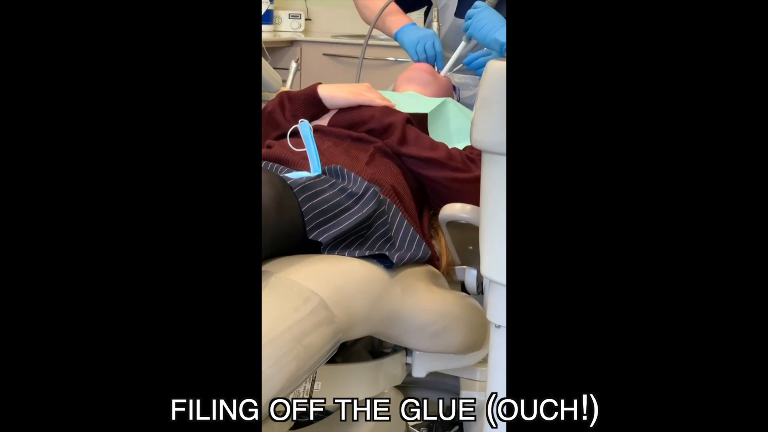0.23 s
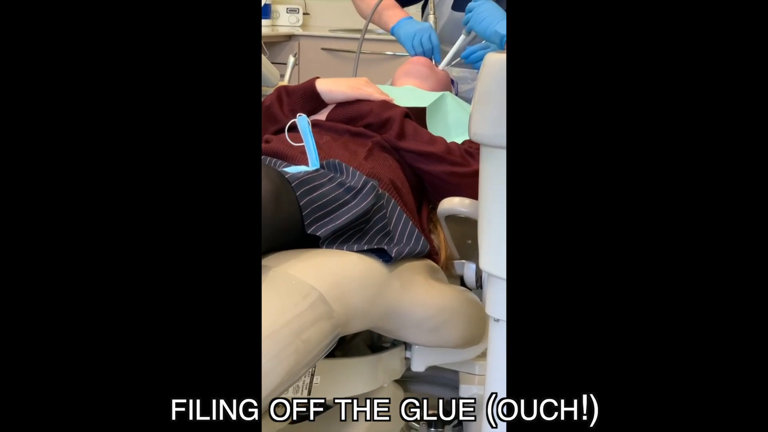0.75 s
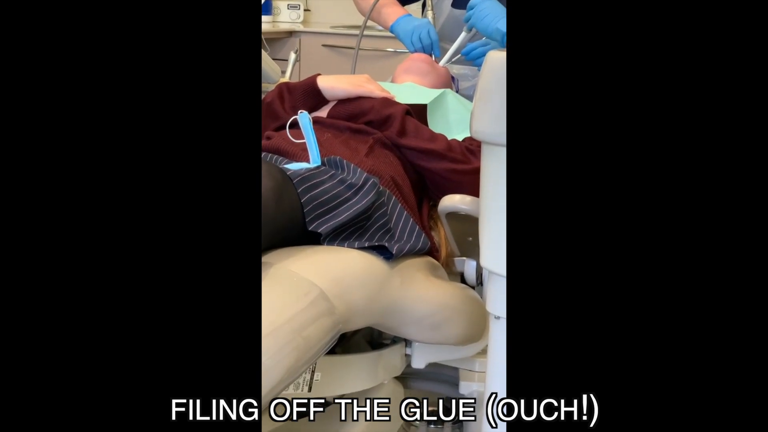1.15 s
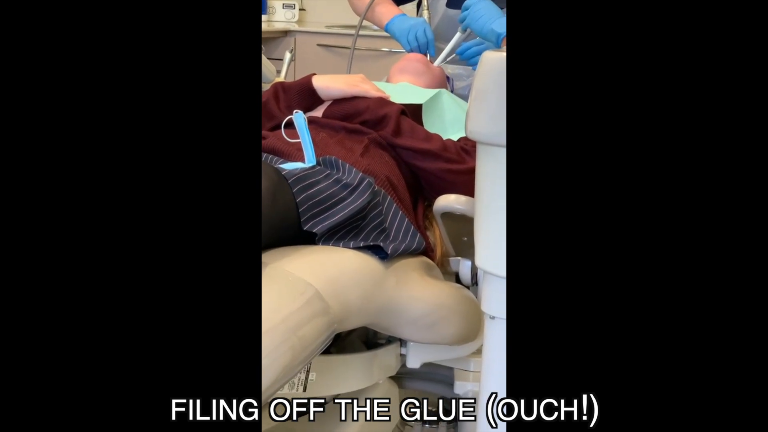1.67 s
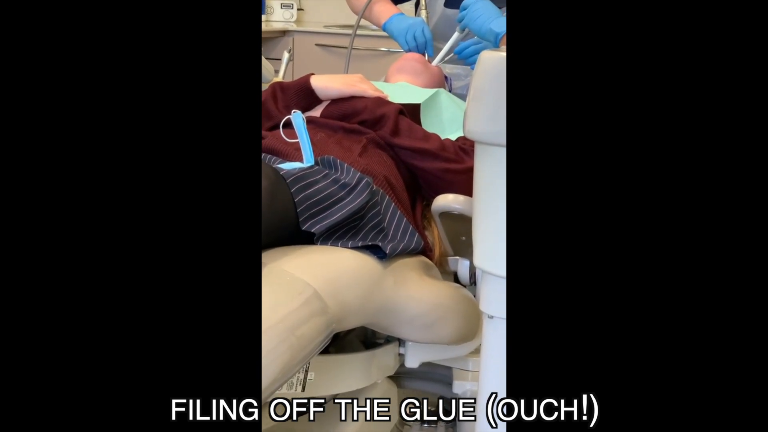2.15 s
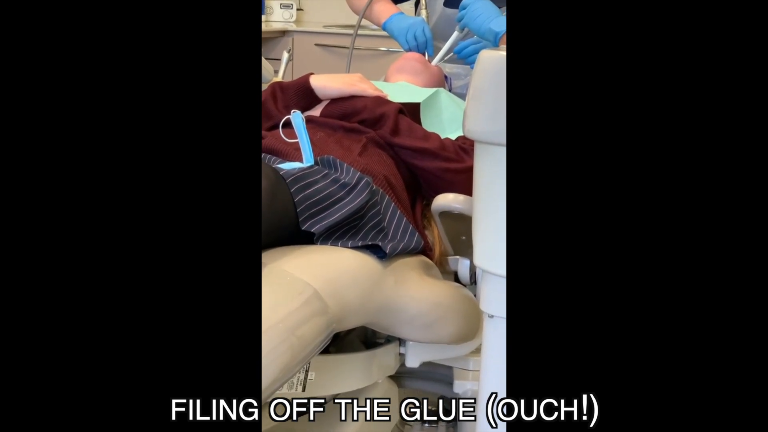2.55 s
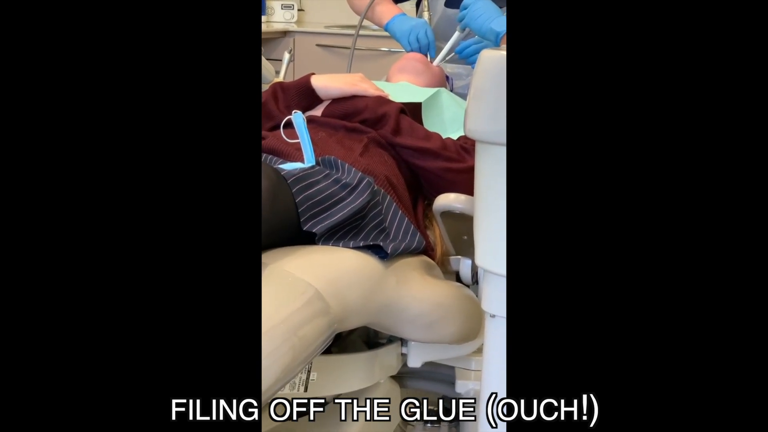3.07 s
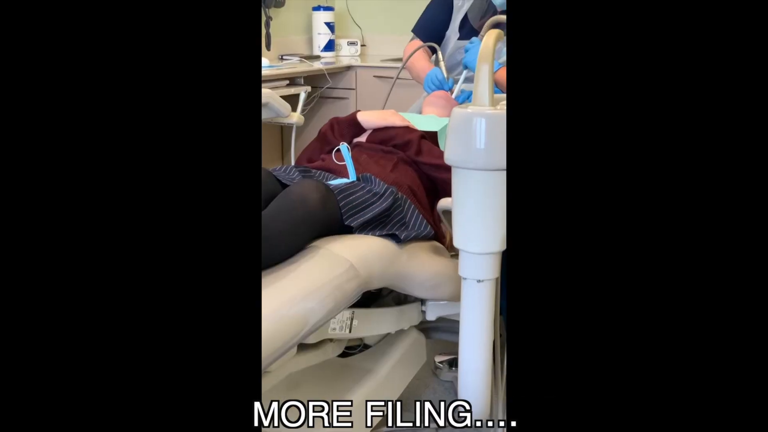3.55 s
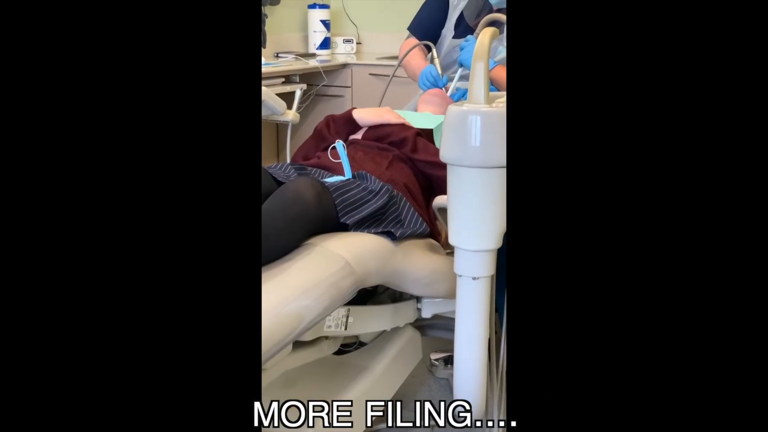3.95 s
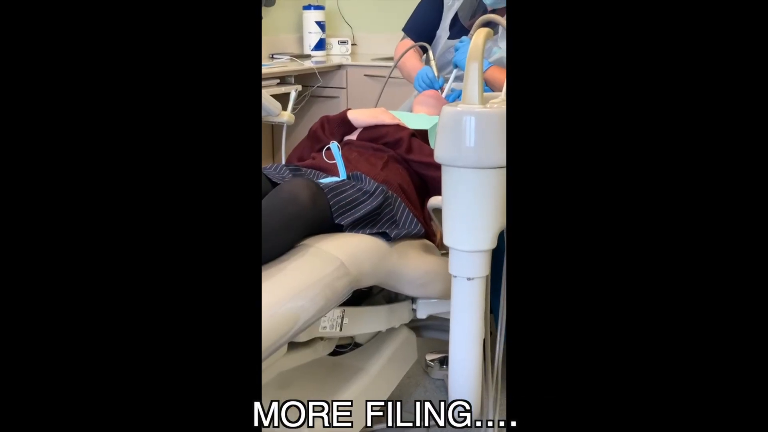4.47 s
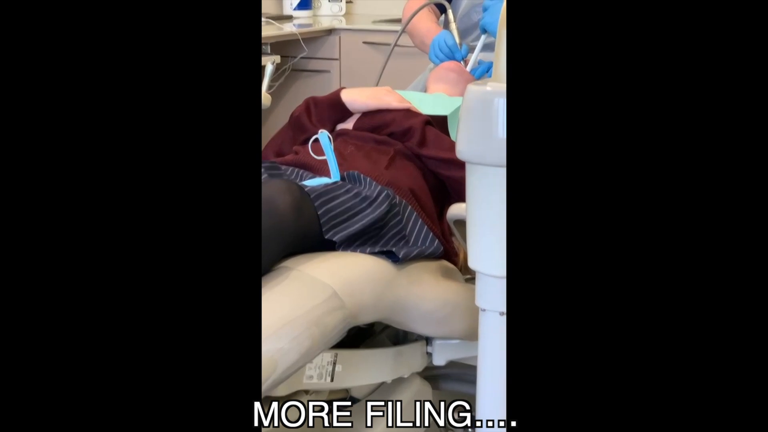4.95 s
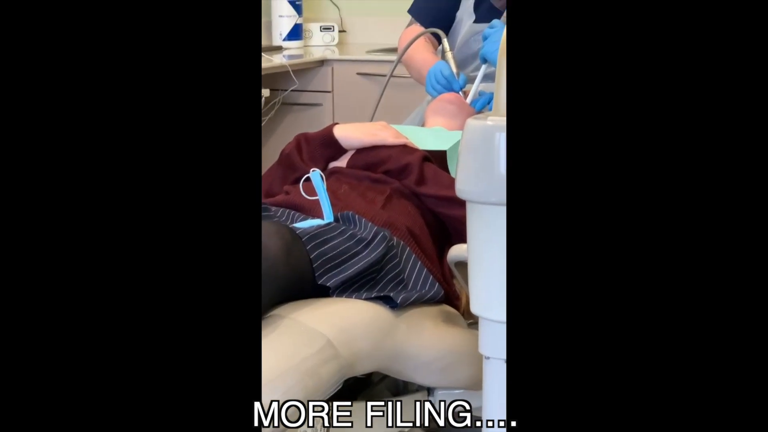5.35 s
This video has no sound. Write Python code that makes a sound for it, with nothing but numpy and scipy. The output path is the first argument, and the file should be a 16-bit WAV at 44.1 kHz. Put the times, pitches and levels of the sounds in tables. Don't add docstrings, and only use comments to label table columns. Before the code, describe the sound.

Constant airy spray and hollow suction noise in a clinic, with faint instrument taps, throbbing pump and a growing bass drone.

```python
import sys
import numpy as np
from scipy import signal
from scipy.fft import rfft, irfft, next_fast_len
from scipy.io import wavfile
from scipy.ndimage import uniform_filter1d, map_coordinates

SR = 44100
rng = np.random.default_rng(int(sys.argv[2]) if len(sys.argv) > 2 else 0)


def store_pcm(level_fs):
    pcm = np.round(np.clip(level_fs, -1, 1) * 32767).astype(np.int16)
    wavfile.write(sys.argv[1], SR, np.atleast_2d(pcm).T)


def to_linear_factor(level_db):
    exponent = np.asarray(level_db, float) / 20
    return 10 ** exponent


N = 247611
CUT_S = 3.228


def at_hz(points, hz, column=1):
    points = np.array(points)
    return np.interp(np.log(hz), np.log(points[:, 0]), points[:, column])


def by_shot(first, second):
    return np.where(np.arange(N) < CUT_S * SR, first, second)


def drift(rate):
    pole = np.exp(-80 * np.pi * rate / SR)
    noise = rng.standard_normal(N // 40 + 2002)
    slow = signal.lfilter([1], [1, -2 * pole, pole * pole], noise)[2000:]
    return np.interp(np.arange(N) / 40, np.arange(len(slow)), slow / slow.std())


def port_noise(spectrum, resonances, ports, lo_hz, hi_hz):
    size = next_fast_len(N)
    hz = np.maximum(np.fft.rfftfreq(size, 1 / SR), 1)
    power = to_linear_factor(at_hz(spectrum, hz)) ** 2 * (hz > spectrum[0][0]) * (hz < spectrum[-1][0])
    peaks = sum((to_linear_factor(db) ** 2 - 1) / (1 + (2 * (hz - f) / width) ** 2) for f, width, db in resonances)
    shape = np.sqrt(power * np.maximum(1 + peaks, 0))

    ridges = rng.standard_normal(SR // 90)
    ridge_db = 1.9 * np.interp(hz / 45, np.arange(len(ridges)), ridges)
    shape = shape * to_linear_factor(ridge_db * (hz > 2300))

    alike = np.clip(at_hz(ports, hz), 0, 1)
    turn = np.exp(.5j * at_hz(ports, hz, column=2))
    tilt = to_linear_factor(at_hz(ports, hz, column=3) / 2)
    shared, apart = rfft(rng.standard_normal((2, size)))
    shared = np.sqrt(1 + alike) * shared
    apart = np.sqrt(1 - alike) * apart
    left = (shared + apart) * turn * tilt
    right = (shared - apart) / turn / tilt
    pair = shape * np.array([left, right])
    band = (hz > lo_hz) & (hz < hi_hz)
    mid_rms = np.sqrt(2 * np.sum(np.abs(pair.mean(axis=0)[band]) ** 2)) / size
    return irfft(pair, size)[:, :N] / mid_rms


# frequency in Hz, density in dB per Hz.
VENT_COLOUR = [(25, -19), (43, 2), (75, -8), (95, -7), (165, -2), (290, 0.5), (360, -1), (480, -3.5),
               (560, -13.5), (1000, -12.5), (1400, -24)]
# frequency in Hz, width in Hz, height in dB.
ROOM_MODES = [(75.3, 13, 13.5), (145.3, 10, 9.5), (251.6, 2.7, 5), (293, 13, 6.5), (338, 16, 6)]
# frequency in Hz, likeness from 0 to 1, lead of the left in radians, left over right in dB.
AIR_PORTS = [
    [(60, 1, 0, 0), (190, .96, -.2, -1.3), (340, .91, -.35, -2), (620, .66, -.7, -3), (1100, .42, .3, -2),
     (1900, .3, .8, -1.5), (2500, .6, 3, -1), (3250, .74, 3.1, 0), (3900, .4, 1.2, 0), (4500, .62, 3, 0)],
    [(60, 1, 0, 0), (190, .96, -.2, -1.3), (340, .91, -.35, -2), (620, .66, -.6, -3), (1100, .42, .3, -2),
     (1900, .3, .8, -1.5), (2700, .76, 3.1, -1), (3200, .72, 3, 0), (3900, .5, 2.6, 0), (4500, .62, 3, 0)],
]


def ventilation():
    level_db = by_shot(-47.5, -46.5) + .5 * drift(1.3)
    return to_linear_factor(level_db) * port_noise(VENT_COLOUR, ROOM_MODES, AIR_PORTS[0], 86, 970)


# frequency in Hz, level in dB rms.
MAINS_LINES = [
    [(100, -52.5), (200, -58)],
    [(100.2, -41), (200.4, -66)],
]


def mains():
    t = np.arange(N) / SR
    shots = [sum(np.sqrt(2) * to_linear_factor(db) * np.sin(2 * np.pi * hz * t) for hz, db in lines)
             for lines in MAINS_LINES]
    return by_shot(*shots) * to_linear_factor(1.2 * drift(4.9))


# pitch in Hz, level in dB, throbs a second,
# throb depth from 0 to 1, top of one throb in seconds.
PUMP = [
    (48.15, -44.5, 2.9, .6, 1.78),
    (48.15, -41, 5.0, .55, 3.52),
]


def pump():
    throb_ends_s, throb_fade_s = 4.1, .4
    t = np.arange(N) / SR
    fade = np.clip((throb_ends_s - t) / throb_fade_s, 0, 1)
    shots = []
    for hz, db, rate, depth, top_s in PUMP:
        throb = 1 + depth * fade * np.cos(2 * np.pi * rate * (t - top_s))
        shots.append(to_linear_factor(db) * throb * np.sin(2 * np.pi * hz * t))
    level = np.sqrt(2) * to_linear_factor(.1 + 0.31 * drift(2.8))
    return level * by_shot(*shots) * to_linear_factor([[-.25], [.25]])


def compressor():
    beat_top_s, start_hz, sag_hz_per_s = 5.1, 42.74, 3.2
    load_from_s, load_rise_s, full_load_db, second_order_db = 4.02, 1.25, -24.5, -32.5
    t = np.arange(N) / SR
    since = t - beat_top_s
    phase = 2 * np.pi * (PUMP[1][0] * beat_top_s + start_hz * since - sag_hz_per_s * since ** 2 / 2)
    load = np.maximum(t - load_from_s, 0) / load_rise_s
    level = np.sqrt(2) * to_linear_factor(full_load_db) * 2 * load ** 2 / (1 + load ** 2)
    second = to_linear_factor(second_order_db) * level / 0.032 * np.sin(2 * phase + 1)
    return level * (np.sin(phase) + second) * to_linear_factor([[-.25], [.25]])


def whirr():
    centre_s, half_length_s, pitch_hz, level_db = 1.23, 0.43, 252.5, -52
    t = np.arange(N) / SR
    swell = np.exp(-((t - centre_s) / half_length_s) ** 4)
    phase = 2 * np.pi * np.cumsum(pitch_hz + 2.5 * drift(3.3)) / SR
    level = np.sqrt(2) * to_linear_factor(level_db + 0.9 * drift(4.8))
    return level * swell * np.sin(phase) * to_linear_factor([[-1], [1]])


# start in seconds, peak in dB, pitch in Hz, share of the upper modes from 0 to 1.
TAPS = [
    (1.287, -36.5, 662, 0.94),
    (1.313, -37, 770, 0.4),
    (1.601, -36, 695, 1),
    (1.62, -38, 915, 0.7),
    (3.13, -31, 670, 1),
    (3.859, -37, 780, .9),
    (4.556, -31.5, 657, 0),
]


def taps():
    out = np.zeros(N)
    t = np.arange(2000) / SR
    envelope = (1 - np.exp(-t / 0.0011)) * to_linear_factor(-60 * t / 0.02)
    for start_s, db, hz, upper in TAPS:
        modes = [(1, 1), (1.35, 0.98 * upper), (1.7, upper)]
        knock = sum(share * np.sin(2 * np.pi * ratio * hz * t) for ratio, share in modes)
        i = round(start_s * SR)
        out[i:i + len(t)] += to_linear_factor(db + 7.5) * knock * envelope
    return np.array([out * to_linear_factor(-1.0), np.roll(out, -4) * to_linear_factor(3.0)])


# time in seconds, spray lift in dB, suction lift in dB.
PRESSES = [(0.13, 0.2, 1.5), (1.15, 1.4, -0.2), (1.47, 2, 0.4), (1.63, 3, 0.9), (1.9, 2, 2),
           (2.6, 1.5, 0.8), (2.84, 2.5, 2), (3.18, 0.1, 1.2), (4.34, 0.5, -0.2), (5.33, 0.2, -1.8),
           (5.53, 0.8, -0.8)]


def pressure():
    rise_s, fade_s = 0.014, 0.14
    t = np.arange(N) / SR
    press_s, *lifts = np.transpose(PRESSES)
    since = t - press_s[:, None]
    rise = np.exp(-.5 * (since / rise_s) ** 2)
    fade = np.exp(-np.abs(since) / fade_s)
    spray_lift, suction_lift = np.array(lifts) @ np.where(since < 0, rise, fade)
    opening = -0.4 * np.exp(-t / 0.31)
    return by_shot(-34, -33) + opening + spray_lift, by_shot(-42.5, -41) + suction_lift


# frequency in Hz, density in dB per Hz.
SUCTION_COLOUR = [
    [(500, -20), (900, -13), (1300, -6.5), (1700, -10), (2300, -12), (2600, -10), (3300, -5), (3800, -8),
     (4400, -5), (5000, -83.5)],
    [(500, -14), (900, -9.5), (1300, -5.5), (1600, -10), (1950, -15), (2700, -8.5), (3100, -5.5),
     (3600, -3), (3950, -14.5), (4400, -4), (5000, -71.5)],
]
# frequency in Hz, width in Hz, height over the roar in dB.
TUBE_MODES = [
    [(1409, 18, 12), (1782, 8, 13), (2070, 22, 12), (3200, 110, -6), (1248, 87, 1.5), (3000, 120, 5),
     (4200, 150, 4)],
    [(958, 18, 10), (1254, 43, 10.5), (1472, 27, 11), (2240, 51, 7.5), (3370, 150, 5.5), (4660, 200, 9.5)],
]


def suction(level_db):
    shots = [port_noise(*shot, 980, 2053) for shot in zip(SUCTION_COLOUR, TUBE_MODES, AIR_PORTS)]
    stretch = np.cumsum(.004 * drift(1.5))
    stretch = stretch - np.linspace(0, stretch[-1], N)
    read = np.clip(np.arange(N) + stretch, 0, N - 1)
    roar = [np.array([map_coordinates(port, [read], order=3) for port in shot]) for shot in shots]
    return to_linear_factor(level_db + .5 * drift(18)) * by_shot(*roar)


# frequency in Hz, density in dB per Hz.
SPRAY_COLOUR = [(3800, -22), (4500, -8), (5100, -7.5), (5600, -2.5), (6400, -2.5), (7650, -5), (8250, .3),
                (9000, -2.5), (10000, -3.5), (10900, -6), (11650, -7.5), (11900, -17), (12150, -24)]
# frequency in Hz, likeness from 0 to 1, lead of the left in radians, left over right in dB.
SPRAY_PORTS = [(4000, .7, 2.1, 0), (4600, .74, 2.7, 0), (5100, .9, 3.14, 0), (5700, .81, 3.62, 0),
               (6900, .8, 5.6, 0), (7600, .93, 6.1, 0), (9300, .94, 6.45, 0), (9900, .78, 7.05, 0),
               (11000, .84, 8.92, 0), (11600, .9, 9.42, 0)]


def spray(level_db):
    shots = []
    for edge_db in (0, 3):
        edges = [(5400, 1200, edge_db), (11500, 1500, edge_db)]
        shots.append(port_noise(SPRAY_COLOUR, edges, SPRAY_PORTS, 6200, 10770))
    return to_linear_factor(level_db + .3 * drift(12)) * by_shot(*shots)


def scene():
    spray_db, suction_db = pressure()
    background = ventilation() + mains() + pump() + compressor() + whirr() + taps()
    return background + suction(suction_db) + spray(spray_db)


# frequency in Hz, masking level over the step in dB, extra coarseness of the weaker channel from 0 to 1.
KEPT = [(200, 40, 0), (500, 29, 0), (1200, 14, 0), (1600, 9, .1), (2200, 6, .2), (3000, 8, .3),
        (4000, 7, .3), (5100, 9, .9), (6000, 8.5, .8), (7300, 10, 1), (9000, 12.5, 1), (10300, 9.5, .7),
        (11200, 9, 1), (11900, 1, 1)]


def masked_lines_removed(x, flicker_db, empty_db, blotch_db):
    hop, grid = 1024, 623
    lines, width = 576, 16
    n, k = np.arange(2 * hop)[:, None], np.arange(lines)
    window = signal.windows.kaiser_bessel_derived(2 * hop, 4 * np.pi)[:, None]
    basis = window * np.sqrt(2 / hop) * np.cos(np.pi / hop * (n + .5 + hop / 2) * (k + .5))

    frames = N // hop + 2
    mid_side = np.array([x[0] + x[1], x[0] - x[1]]) / 2
    padded = np.pad(mid_side, ((0, 0), (hop - grid, 3 * hop)))
    blocks = padded[:, :(frames + 1) * hop].reshape(2, frames + 1, hop)
    lapped = np.concatenate([blocks[:, :-1], blocks[:, 1:]], axis=2)
    coef = (lapped @ basis).reshape(2, frames, -1, width)

    band = np.mean(coef ** 2, axis=3) + 1e-20
    louder = band.max(axis=0)
    mask = uniform_filter1d(louder, size=3, axis=1)
    hz = (np.arange(lines // width) + .5) * width * SR / 2 / hop
    coarser = (louder / band) ** (at_hz(KEPT, hz, column=2) / 2)
    flicker = flicker_db * rng.standard_normal(band.shape)
    step = np.sqrt(mask) * coarser * to_linear_factor(flicker - at_hz(KEPT, hz))
    near_cut = np.abs(np.arange(frames) * hop + grid - CUT_S * SR) < hop
    step[0, near_cut] *= to_linear_factor(-14)
    kept = np.sign(coef) * np.floor(np.abs(coef) / step[..., None] + .4) * step[..., None]

    blotch = np.sqrt(uniform_filter1d(band, size=3, axis=1)) * (hz > 2200)
    patches = uniform_filter1d(rng.standard_normal(band.shape), size=5, axis=1)
    blotch = blotch * to_linear_factor(blotch_db + 3.5 * patches)
    local = uniform_filter1d(coef.reshape(2, frames, -1) ** 2, size=4, axis=2)
    local = uniform_filter1d(local, size=3, axis=1)
    limit = np.repeat(np.log(np.maximum(step * to_linear_factor(empty_db), blotch)), width, axis=2)
    limit = uniform_filter1d(limit, size=width, axis=2)
    limit = np.exp(uniform_filter1d(limit, size=2, axis=1))
    kept *= (np.sqrt(np.abs(local)) > limit).reshape(coef.shape)

    removed = (coef - kept).reshape(2, frames, lines) @ basis.T
    blocks = blocks.copy()
    blocks[:, :-1] -= removed[..., :hop]
    blocks[:, 1:] -= removed[..., hop:]
    mid, side = blocks.reshape(2, -1)[:, hop - grid:hop - grid + N]
    return np.array([mid + side, mid - side])


def low_pass(x):
    return signal.sosfilt(signal.butter(12, 12100, fs=SR, output="sos"), x)


def record(dry):
    mix = masked_lines_removed(dry, flicker_db=2.2, empty_db=-4, blotch_db=-2.35)
    return low_pass(mix)


dry = scene()
out = record(dry)
store_pcm(out)
```